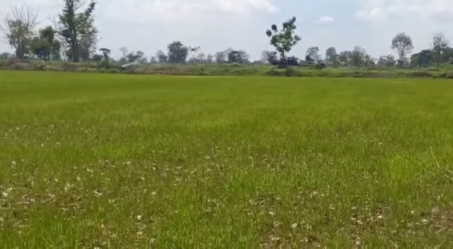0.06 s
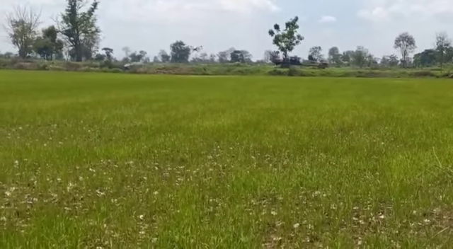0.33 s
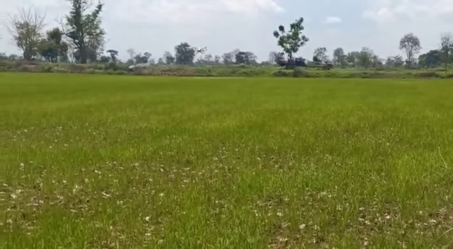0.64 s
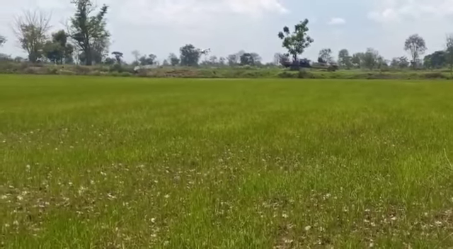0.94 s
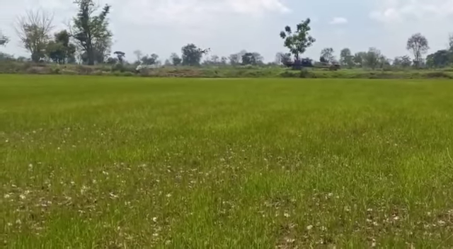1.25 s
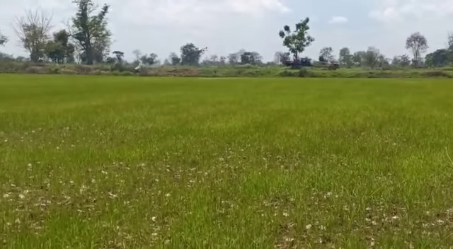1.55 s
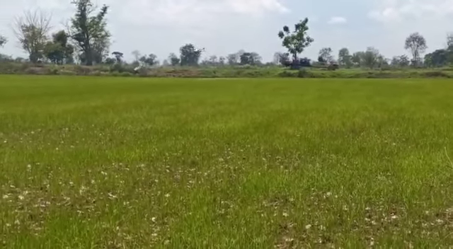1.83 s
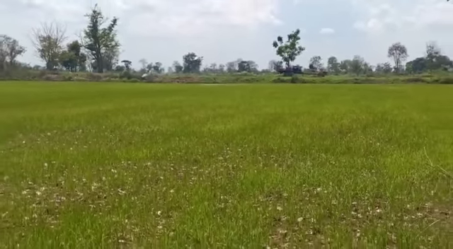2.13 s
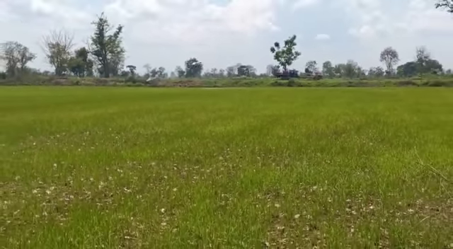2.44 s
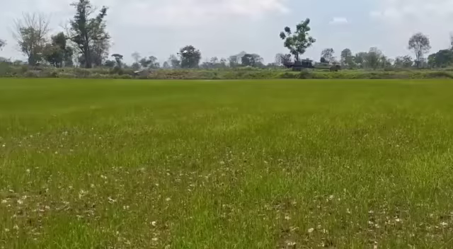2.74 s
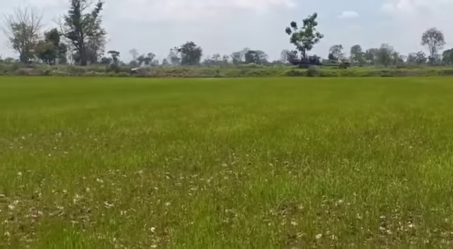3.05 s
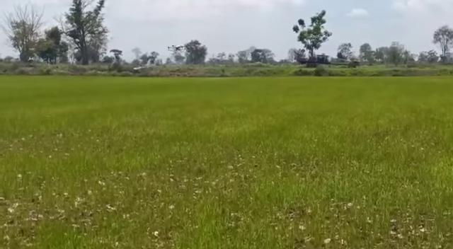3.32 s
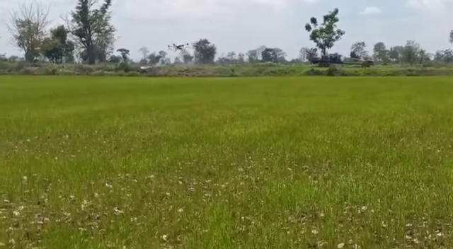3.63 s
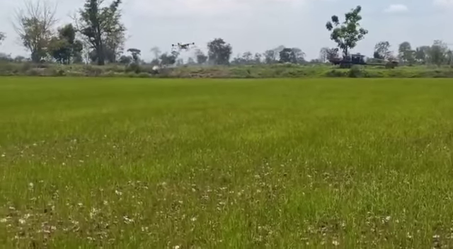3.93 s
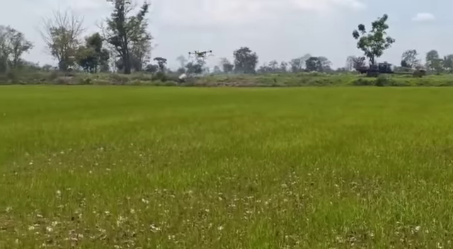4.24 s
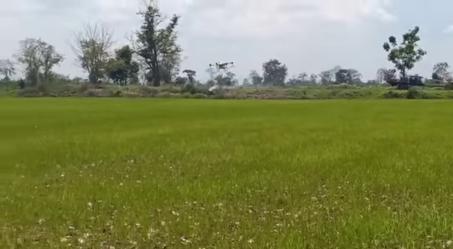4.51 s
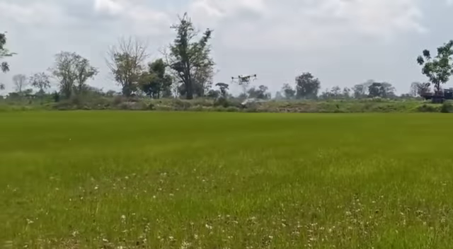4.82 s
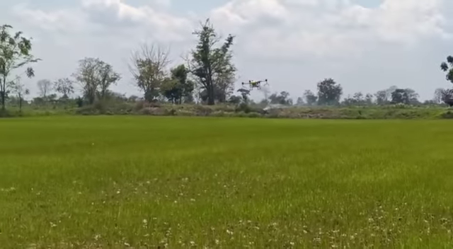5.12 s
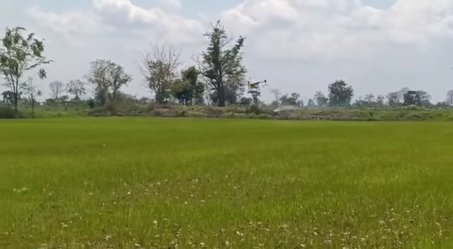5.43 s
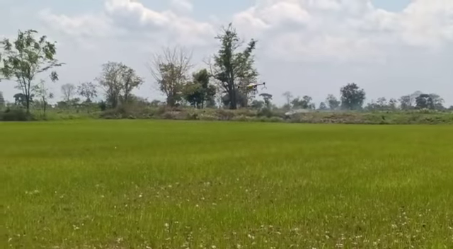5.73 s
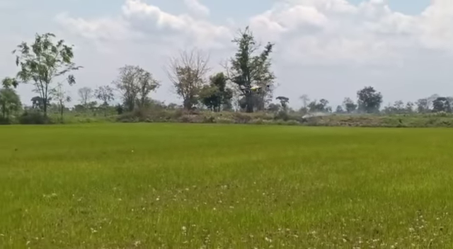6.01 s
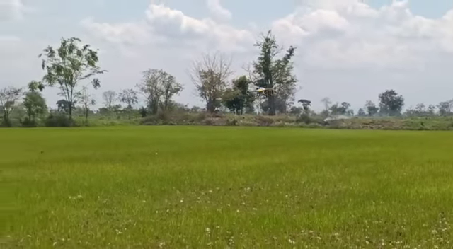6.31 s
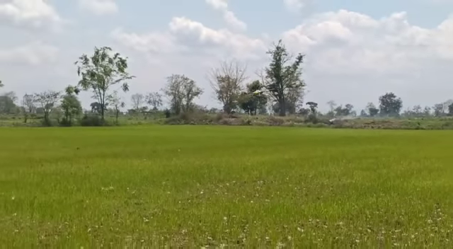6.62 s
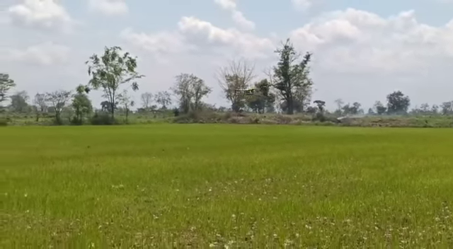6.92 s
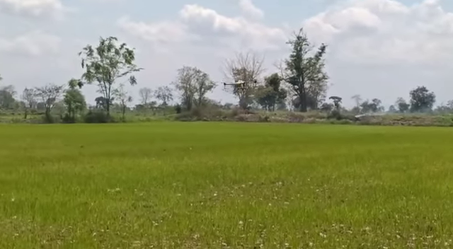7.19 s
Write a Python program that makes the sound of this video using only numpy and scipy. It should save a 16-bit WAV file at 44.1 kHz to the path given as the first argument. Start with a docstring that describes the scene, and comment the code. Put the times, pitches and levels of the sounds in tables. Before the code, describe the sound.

A multirotor drone is heard far off over an open field for the whole seven seconds: a steady, hollow, hissing whir with a light flutter, a soft wavering hum and a thin, very high whine on top. Wind strikes the microphone close up, mostly on the right. Short low puffs come in the first two seconds, the clearest at about 0.3 seconds. From about 2.3 to 4.6 seconds strong gusts rumble and thump, much louder than the drone, peaking just after 4 seconds. The wind then drops, and the drone swells slightly around 4.5 seconds, 5.8 seconds and at the end. Lighter gusts return from about 6.5 seconds. Faint, brief bird chirps are scattered through the first five and a half seconds, with a few tiny dry ticks nearby and a quiet, low outdoor rumble underneath.

```python
"""A spraying drone works far off over a rice field, heard from the field's edge.
Two groups of rotors hum and chop the air at different speeds, a thin whine rides on top, and the
ground's reflection hollows the rush. Behind it are a low murmur, distant birds and faint ticks.
Gusts buffet the microphone, mostly its right port (sound opening), and about halfway through
the microphone turns to face the drone."""
import sys
import numpy as np
from scipy import signal
from scipy.fft import rfft, irfft
from scipy.io import wavfile
from scipy.ndimage import uniform_filter1d, minimum_filter1d

SR = 44100
rng = np.random.default_rng(int(sys.argv[2]) if len(sys.argv) > 2 else 0)


def output_pcm(signal):
    """Save a mono or channel-first signal as 16-bit PCM at the path in sys.argv[1].

    Samples are clipped to [-1, 1] before scaling.
    """
    pcm = np.clip(np.atleast_2d(signal).T, -1, 1) * 32767
    wavfile.write(sys.argv[1], SR, np.round(pcm).astype(np.int16))


N = 320166
TIME = np.arange(N) / SR
FREQS = np.fft.rfftfreq(N, 1 / SR)


def gain_of(db):
    """Turns decibels into a number to multiply a sound by."""
    return 10 ** (np.asarray(db) / 20)


def evened(x):
    """Scales a signal to an average size (rms) of 1."""
    return x / np.sqrt(np.mean(x ** 2) + 1e-20)


def over_frequency(rows):
    """Fills in a table's columns at every frequency."""
    hz, *columns = np.transpose(rows)
    return np.squeeze([np.interp(np.log(FREQS + 1), np.log(hz + 1), column) for column in columns])


def over_time(rows):
    """Fills in a table's columns at every sample."""
    times, *columns = np.transpose(rows)
    return [np.interp(TIME, times, column) for column in columns]


def drift(rate_hz):
    """A smooth random wobble of size 1, moving up to about rate_hz times a second."""
    return evened(irfft(rfft(rng.standard_normal(N)) * np.exp(-(FREQS / rate_hz) ** 2), N))


def noise(colour):
    """Noise of size 1 with the given colour (its balance of low and high)."""
    return evened(irfft(rfft(rng.standard_normal(N)) * gain_of(over_frequency(colour)), N))


def band(x, low_hz, high_hz):
    """The part of a sound between two frequencies."""
    return irfft(rfft(x) * ((FREQS >= low_hz) & (FREQS < high_hz)), N)


def turned(start_s=4.05, length_s=0.95):
    """How far the microphone has turned toward the drone, from 0 to 1."""
    return np.clip((TIME - start_s) / length_s, 0, 1)


# how alike the two ports sound: (frequency [Hz], likeness [0-1])
PORT_LIKENESS = [(200, 1), (1250, 0.91), (1600, 1), (2000, 0.52), (4000, 0.58), (8000, 0.34), (9550, 0)]
# how far the left port's wave leads: (frequency [Hz], drone aside [radians], drone ahead [radians])
LEFT_LEAD = [(100, -1.5, 0.5), (1280, 1.03, -0.5), (1550, -2, -0.6), (1870, 0, -1), (2085, 2.3, -1),
             (2383, -3.5, -1.5), (2710, -3.5, -5), (3040, -6, -5), (4040, -6.5, -4.5), (4780, -8, -8),
             (5760, -8.5, -7), (6960, -13, -11), (8900, -14, -13.5), (12000, -17, -12.5), (15000, -20, -18)]
def ports(left_spectrum, other_spectrum):
    """Left and right sound: the right is partly like the left, shifted as the microphone turns."""
    likeness = np.clip(over_frequency(PORT_LIKENESS), 0, 1)
    right_spectrum = likeness * left_spectrum + np.sqrt(1 - likeness ** 2) * other_spectrum
    aside, ahead = over_frequency(LEFT_LEAD)
    steps = np.linspace(0, 1, 5)  # blend through five positions of the turn
    views = [irfft(right_spectrum * np.exp(-1j * (aside + step * (ahead - aside))), N) for step in steps]
    weights = [np.interp(turned(), steps, row) for row in np.eye(len(steps))]
    right = np.sum(np.multiply(views, weights), axis=0)
    return np.array([irfft(left_spectrum, N), right])


# colour of the murmur: (frequency [Hz], level [dB])
MURMUR_COLOUR = [(20, 2), (60, 3.5), (170, -3.5), (240, -5.5), (330, -7), (450, -16.5), (900, -29)]
def murmur(level_db=-49.5):
    """The low, steady noise of open country."""
    return gain_of(level_db) * ports(rfft(noise(MURMUR_COLOUR)), rfft(noise(MURMUR_COLOUR)))


# bird calls: (time [s], length [s], start pitch [Hz], end pitch [Hz], level [dB])
BIRD_CHIRPS = [(0.029, .06, 2300, 2220, -56), (0.307, .04, 3900, 3500, -58), (.44, .04, 2350, 2120, -55),
               (1, .03, 6040, 5560, -47), (1.246, .05, 2410, 1990, -50), (1.84, .03, 5500, 6130, -46),
               (3.39, 0.045, 5700, 4900, -44), (4.27, .03, 5470, 5900, -50), (4.848, .025, 6220, 5640, -44),
               (5.43, 0.038, 6040, 5590, -48)]
def birds(boost_db=6.0, waver_hz=133.0):
    """Small birds give short gliding whistles, unsteady over the distance."""
    out = np.zeros(N)
    waver = waver_hz * drift(208)
    for start, length, start_hz, end_hz, db in BIRD_CHIRPS:
        progress = np.clip((TIME - start) / length, 0, 1)
        cycles = np.cumsum(start_hz + (end_hz - start_hz) * progress + waver) / SR
        out += gain_of(db + boost_db) * np.sin(np.pi * progress) * np.sin(2 * np.pi * cycles)
    return ports(rfft(out), rfft(out) * 1j)


# faint dry ticks close by: (time [s], level [dB])
TICKS = [(.922, -47), (1.2, -43), (2.245, -47), (3.025, -43), (3.494, -45), (4.675, -46), (6.955, -45)]
def ticks(decay_s=0.003):
    """Tiny bright snaps of noise that die at once."""
    loudness = sum(gain_of(db) * (TIME >= at) * np.exp(-abs(TIME - at) / decay_s) for at, db in TICKS)
    return loudness * evened(band(rng.standard_normal((2, N)), low_hz=5500, high_hz=12000))


# gusts striking the microphone: (time [s], length [s], left level [dB], right level [dB])
GUSTS = [(0, 0.029, -50, -32), (0.087, 0.052, -31, -44), (0.307, 0.1, -44, -25), (0.798, .04, -52, -32),
         (0.919, 0.036, -49, -34), (1.196, 0.047, -58, -42.5), (1.41, 0.067, -38, -55),
         (1.879, 0.024, -52, -32.5), (2.07, 0.049, -52, -33.5), (2.222, 0.096, -35, -30),
         (2.391, 0.14, -37, -18.5), (2.481, 0.13, -34, -13), (2.686, 0.3, -30, -13), (3.055, .11, -33, -11),
         (3.183, 0.055, -35, -25), (3.269, 0.19, -39, -14.5), (3.669, 0.023, -47, -27.5),
         (3.76, 0.08, -32.5, -36), (3.89, .19, -31.5, -18.5), (4.089, 0.085, -37, -8.5),
         (4.24, 0.18, -33, -12), (4.448, 0.038, -36, -17.5), (4.512, 0.068, -45, -13),
         (4.831, 0.035, -33, -48), (5.148, 0.064, -34.5, -45), (5.525, 0.14, -49, -34.5),
         (6.514, .025, -48, -28.5), (6.601, 0.22, -34.5, -33), (6.907, 0.4, -41, -32.5)]
def gust_levels(rise_db_per_s=600, fall_db_per_s=526, linger_s=0.2, light_air_db=(-51.5, -46.5)):
    """Wind strength in dB at each port: gusts rise, hold and fall over lightly stirring air."""
    power = np.array([gain_of(db + 3.5 * drift(12)) ** 2 for db in light_air_db])
    for start, length, left_db, right_db in GUSTS:
        near = abs(TIME - start - length / 2) < 0.5
        before = np.maximum(start - TIME[near], 0)
        after = np.maximum(TIME[near] - start - length, 0)
        # long gusts die away more slowly
        core_db = -rise_db_per_s * before - fall_db_per_s * after / (1 + length / linger_s)
        fringe_db = -7 - 128 * (before + 2 * after)  # weaker air around the gust
        power[:, near] += gain_of(np.maximum(core_db, fringe_db) + [[left_db], [right_db]]) ** 2
    return 10 * np.log10(power)


# colour of gentle wind: (frequency [Hz], level [dB])
BREEZE_COLOUR = [(12, -33), (20, 1), (76, 3), (138, -0.5), (247, -13.5), (282, -25), (405, -58), (450, -27),
                 (580, -71), (990, -120)]
# colour of strong wind: (frequency [Hz], level [dB])
GALE_COLOUR = [(12, -46), (20, -12.5), (66, 2.5), (146, 0), (256, -10), (300, -20.5), (327, -14.5),
               (456, -20), (983, -50), (1190, -43), (1300, -52.5), (1690, -64), (2860, -120)]
def eddies(db, boost_db, gale_db, breeze_db=-34.0, calm_db=-47.5, lumpy_db=3.0, burstiness=0.86):
    """Swirls of air at one port: stronger gusts sound brighter; big swirls shed small ones in bursts."""
    power = gain_of(db) ** 2
    loudness = np.sqrt(np.maximum(power - gain_of(calm_db) ** 2, power / 6))
    force = np.clip((db - breeze_db) / (gale_db - breeze_db), 0, 1)
    flow = np.sqrt(1 - force) * noise(BREEZE_COLOUR) + np.sqrt(force) * noise(GALE_COLOUR)
    flow *= gain_of(lumpy_db * drift(36))
    big = band(flow, low_hz=0, high_hz=360)
    bursts = evened(abs(signal.hilbert(big)) ** burstiness)  # follows the strength of the big swirls
    small = (flow - big) * bursts / np.sqrt(uniform_filter1d(bursts ** 2, size=4000) + 1e-9)
    flow = big + small
    local_size = np.sqrt(uniform_filter1d(flow ** 2, size=3000) + 1e-9)
    return gain_of(boost_db) * loudness * flow / local_size


def wind():
    """Each port meets its own swirling air and rumbles."""
    left_db, right_db = gust_levels()
    left = eddies(left_db, boost_db=1.5, gale_db=-1.0)
    right = eddies(right_db, boost_db=1.06, gale_db=-16.0)
    return np.array([left, right])


# single swirls hitting the right port: (time [s], level [dB], half width [s])
WIND_THUMPS = [(0.335, -13.5, 0.0032), (0.37, -6.5, 0.0014), (0.403, -11, 0.0025), (2.236, -18, 0.00091),
               (2.296, -11, 0.0031), (2.479, -10, 0.00086), (2.754, -3, 0.00072), (2.838, -3.5, 0.00064),
               (2.875, -12.5, 0.00043), (2.887, -5, 0.00073), (3.063, -18, 0.00064), (3.107, -6, 0.00069),
               (3.124, -4, 0.00072), (3.343, -5, 0.00063), (3.409, -4.5, 0.0033), (3.965, -8.5, 0.00066),
               (4.090, 3, 0.0007), (4.123, -3, 0.00061), (4.137, -12, 0.00043), (4.153, -11, 0.00052),
               (4.251, -5.5, 0.0013), (4.333, -6.5, 0.00063), (4.529, -3.5, 0.00078)]
def thumps(left_db=-46.0):
    """A swirl of air crosses the port: a push, a sharp suck and a push again."""
    out = np.zeros(N)
    for at, db, half_width in WIND_THUMPS:
        offset = (TIME - at) / half_width
        out += gain_of(db) * (offset ** 2 - 1) * np.exp(-np.minimum(offset ** 2 / 2, 50))
    return out * gain_of([[left_db], [0]])


# the whine's changing pitch: (time [s], pitch [Hz])
WHINE_PITCH = [(0, 12750), (.8, 12770), (1.1, 12840), (1.5, 13000), (2, 13095), (2.65, 13070), (3.2, 13175),
               (3.55, 13230), (3.75, 13330), (3.9, 13170), (4.5, 13185), (4.95, 13130), (5.2, 13180),
               (5.65, 13190), (6.1, 13215), (6.6, 13165), (6.85, 13205), (7.26, 13125)]
# the whine's changing strength: (time [s], level [dB])
WHINE_LEVEL = [(0, -50), (.09, -65), (.9, -66), (1.3, -60), (2.06, -57.5), (3.05, -58.5), (3.2, -52.5),
               (3.53, -45.5), (3.72, -68), (4.6, -55.5), (4.97, -64), (5.16, -56), (5.52, -64), (5.74, -50),
               (6.16, -47), (6.55, -58), (6.9, -51), (7.26, -51)]
# tones that make up the whine: (distance from its pitch [Hz], level [dB])
WHINE_TONES = [(2, -2), (-280, -7), (271, -14), (-420, -19)]
def whine(wander_hz=8.0, flutter_db=2.5, fading_db=2.5, hiss_db=-15.0, right_db=-14.0):
    """The drone's thin whistle: close tones in a narrow hiss, each fading and fluttering on its own."""
    (hz,), (db,) = over_time(WHINE_PITCH), over_time(WHINE_LEVEL)
    cycles = np.cumsum(hz + wander_hz * drift(25)) / SR
    out = gain_of(hiss_db) * np.array([drift(330), drift(330)]) * np.sin(2 * np.pi * cycles)
    for offset_hz, tone_db in WHINE_TONES:
        wobble_db = flutter_db * np.array([drift(50), drift(50)]) + fading_db * drift(8)
        out += gain_of(tone_db + wobble_db) * np.sin(2 * np.pi * (cycles + offset_hz * TIME))
    return np.sqrt(2) * out * gain_of(db) * gain_of([[0], [right_db]])


# motor-like tones, lowest first: (pitch [Hz], level [dB], pitch wander [Hz])
MOTOR_TONES = [(201.6, -58.5, 0.61), (1060, -68.5, 1.57), (1170, -64, 5.9), (1212, -65.5, 5.7),
               (1250, -79, 7.1)]
def motors(fading_db=2.5, approach_db=6.0, approach_s=5.2):
    """Gently wavering tones; all but the lowest grow as the drone comes nearer."""
    nearer_db = approach_db * np.clip(TIME / approach_s - 1, -1, 0)
    out = np.zeros(N)
    for row, (hz, db, wander_hz) in enumerate(MOTOR_TONES):
        cycles = np.cumsum(hz + wander_hz * drift(7.26)) / SR
        out += gain_of(db + (row > 0) * nearer_db + fading_db * drift(7)) * np.sin(2 * np.pi * cycles)
    return np.sqrt(2) * out


# blade passes per second and depth of chop for the slow and the (mostly) fast rotor group:
# (time [s], slow rate [Hz], fast rate [Hz], slow chop [0-1], fast chop [0-1])
ROTOR_MOTION = [(0, 76, 70, 0.1, 0.18), (.6, 76.5, 73, 0.6, .3), (.95, 77.8, 79, 0.4, .25),
                (1.5, 76.3, 105, 0.94, .25), (1.9, 75, 75, 0.32, .25), (2.6, 75.3, 85, .4, 0.21),
                (2.9, 74.5, 94, 0.1, 0.44), (3.35, 74.7, 70, 0.7, .25), (3.9, 70.5, 82, 0.2, 0.16),
                (4.3, 70, 104, 0.39, .4), (4.65, 69.7, 80.5, 0.5, 0.34), (4.9, 71.5, 85, 0.6, 0.13),
                (5.25, 69.5, 80, 0.4, .2), (5.8, 69.3, 84, 0.55, 0.36), (6.4, 69.2, 81, 0.1, .2),
                (7.26, 70, 87, .25, .2)]
def rotor_groups(unsteady_hz=0.696):
    """For each slightly unsteady rotor group: a running count of blade passes, and its chop depth."""
    slow_hz, fast_hz, slow_chop, fast_chop = over_time(ROTOR_MOTION)
    return [(np.cumsum(hz + unsteady_hz * drift(5.9)) / SR, chop)
            for hz, chop in [(slow_hz, slow_chop), (fast_hz, fast_chop)]]


# tones in the hum: (multiple of the blade rate, slow group level [dB], fast group level [dB])
BLADE_TONES = [(1, -72, -71), (2, -60.5, -54.5), (3, -66, -59.5), (4, -68, -70.5), (5, -83.5, -74.5),
               (7, -80, -77), (8, -78.5, -74.5), (9, -80, -72)]
# how the hum swells: (time [s], slow group level [dB], fast group level [dB])
HUM_SWELL = [(0, 0.5, -12), (2, 3.5, -15.5), (4.5, 5.5, -3), (5.8, 0, 1), (7.26, 10, 2)]
def rotor_hum(groups, fading_db=4.0, fading_hz=7.0):
    """The blades hum at multiples of their passing rate; each tone fades in and out over the distance."""
    out = np.zeros(N)
    for multiple, *tone_dbs in BLADE_TONES:
        for (passes, _), swell_db, tone_db in zip(groups, over_time(HUM_SWELL), tone_dbs):
            loudness = gain_of(tone_db + swell_db + fading_db * drift(fading_hz))
            out += loudness * np.sin(2 * np.pi * (multiple * passes + rng.random()))
    return np.sqrt(2) * out


def ground(delay_s, strength, fade_hz):
    """The ground's echo comes just late, lifting some pitches, hollowing others; grass eats its highs."""
    echo = strength / np.sqrt(1 + (FREQS / fade_hz) ** 2)
    return abs(1 + echo * np.exp(-2j * np.pi * FREQS * delay_s))


# narrow peaks and dips that hollow the rush: (frequency [Hz], width [Hz], level [dB])
RUSH_PEAKS_AND_DIPS = [(1630, 140, -3), (2710, 220, -5), (2970, 320, 2.5), (3600, 200, -0.5),
                       (4380, 300, 2.5), (5240, 340, 0), (9600, 420, -3.5)]
def rush_peaks_and_dips():
    """Some narrow bands are louder and others quieter, so the rush sounds hollow."""
    return gain_of(sum(db / (1 + (2 * (FREQS - hz) / width) ** 2)
                       for hz, width, db in RUSH_PEAKS_AND_DIPS))


# how the turn changes the rush: (frequency [Hz], level change [dB])
FACING_COLOUR = [(1000, 0.5), (1600, -1), (2250, 1), (3400, -1.5), (5200, 1.3), (6900, -1.5), (8000, 1.8),
                 (14000, 1)]
def facing(sound):
    """The colour shifts as the microphone comes round to face the drone."""
    half_change = gain_of(over_frequency(FACING_COLOUR) / 2)
    aside = irfft(rfft(sound) / half_change, N)
    ahead = irfft(rfft(sound) * half_change, N)
    return (1 - turned()) * aside + turned() * ahead


# colour of the rush: (frequency [Hz], left level [dB], right level [dB])
RUSH_COLOUR = [(150, -9, -1.5), (450, -11.5, -6.5), (940, -3.5, -4.5), (1760, -9, -7), (2023, -0.5, -2.5),
               (2350, 0.6, -5), (2980, -3, -1.9), (4600, -2, -4.5), (5310, -4, -6.5), (7130, -12, -8.5),
               (9000, -12.5, -11.5), (9820, -17, -32), (10960, -11, -18), (15000, -28.5, -26)]
# how the rush swells in three bands, low to high: (time [s], body [dB], hiss [dB], fizz [dB])
RUSH_SWELL = [(0, -5.5, -5.5, -2), (.45, -1.5, -1, 0.5), (.78, -2.5, -.5, -2.5), (1.05, -1, 0.7, 2),
              (1.35, 1.5, 2, -0.5), (1.66, -2, 0.5, 0.5), (2.2, -0.3, -1, -0.3), (2.68, 1.1, -0.3, -1.5),
              (3.05, 1.5, 2.5, 2), (3.66, -1, -0.4, 2.5), (3.98, -0.7, -1.5, -2.5), (4.55, 4.5, 4.5, 4.5),
              (4.85, 4, -0.5, 1), (5.3, 2, -2, -0.5), (5.8, 3.5, 3.5, 3.5), (6.42, -1.5, -3.5, -1.2),
              (6.8, .8, -1, .8), (7.26, 5, 0.9, 2.8)]
def rotor_rush(groups, level_db=-47.5, sharpness=2.0, shimmer_db=0.42, patchy_db=0.88):
    """Each passing blade throws a puff of hiss; moving air makes the distant sound swell and shimmer."""
    power = 0
    for passes, chop in groups:
        puff = np.exp(sharpness * np.cos(2 * np.pi * passes))
        power = power + 1 - chop + chop * puff / puff.mean()
    air = ports(*rfft(np.sqrt(power) * rng.standard_normal((2, N))))
    reflection = np.array([ground(delay_s=0.001542, strength=0.61, fade_hz=1500),
                           ground(delay_s=0.001591, strength=0.47, fade_hz=1700)])
    rush = irfft(rfft(air) * gain_of(over_frequency(RUSH_COLOUR)) * reflection * rush_peaks_and_dips(), N)
    rush /= np.std(band(rush, 2700, 5400))  # the hiss band sets the scale
    body, hiss, fizz = over_time(RUSH_SWELL)
    bands = [(0, 1000, 0.25 * body), (1000, 2700, body), (2700, 5400, hiss), (5400, SR, fizz)]
    swelling = sum(band(rush, low, high) * gain_of(db + patchy_db * drift(23)) for low, high, db in bands)
    return swelling * gain_of(level_db + shimmer_db * drift(43))


def scene():
    """The drone over the country's murmur, birds and ticks, with wind close on the microphone."""
    groups = rotor_groups()
    drone = facing(rotor_rush(groups)) + rotor_hum(groups) + motors() + whine()
    return drone + murmur() + birds() + ticks() + wind() + thumps()


def record(dry, ceiling=1.0, cutoff_hz=15350):
    """A limiter turns down the hardest buffets, then a filter removes the very highest sounds."""
    peak = -minimum_filter1d(-np.maximum(abs(dry), ceiling), size=400, axis=1)
    limited = dry * uniform_filter1d(ceiling / peak, size=400, axis=1)
    lowpass = signal.firwin(511, cutoff_hz, window=("kaiser", 9), fs=SR)
    return signal.oaconvolve(limited, lowpass[None], "same")


dry = scene()
out = record(dry)
output_pcm(out)
```